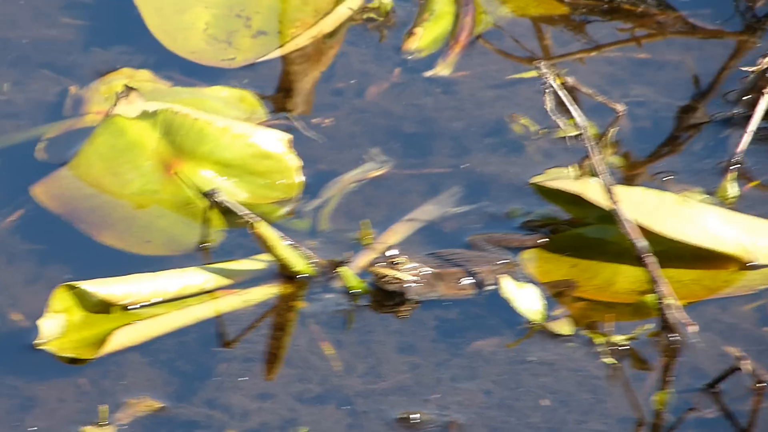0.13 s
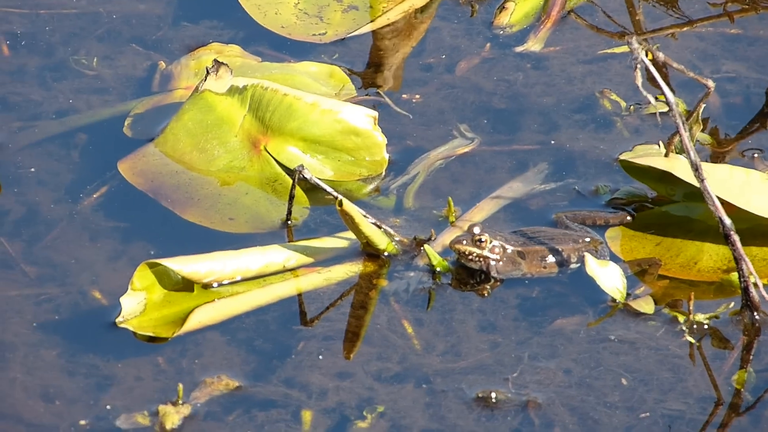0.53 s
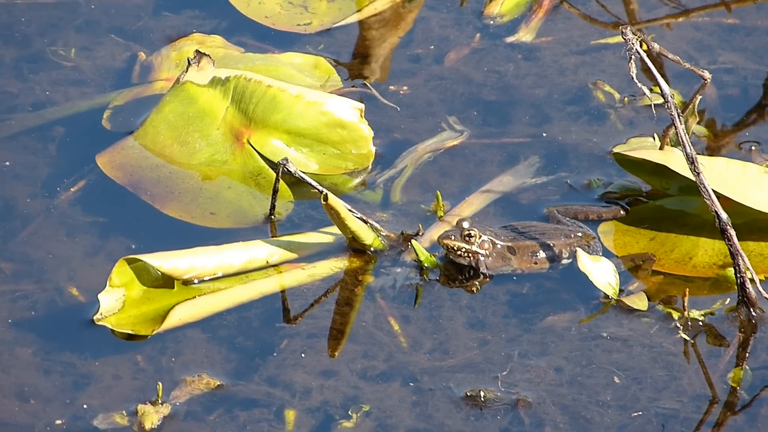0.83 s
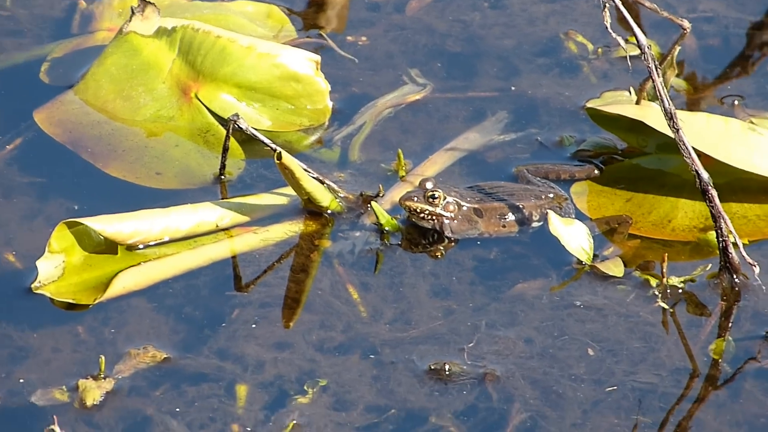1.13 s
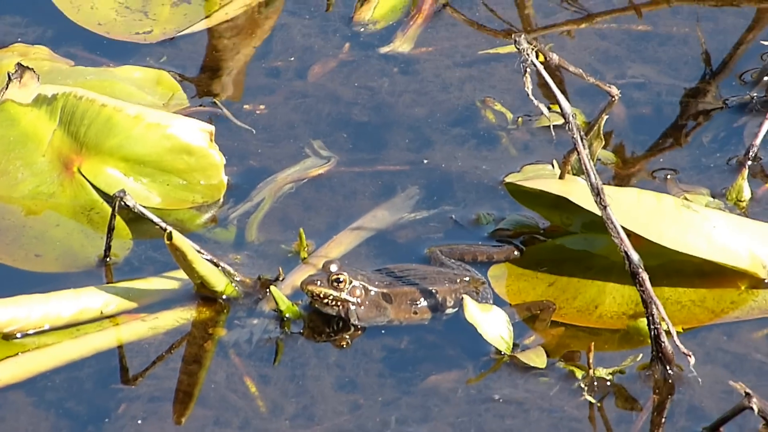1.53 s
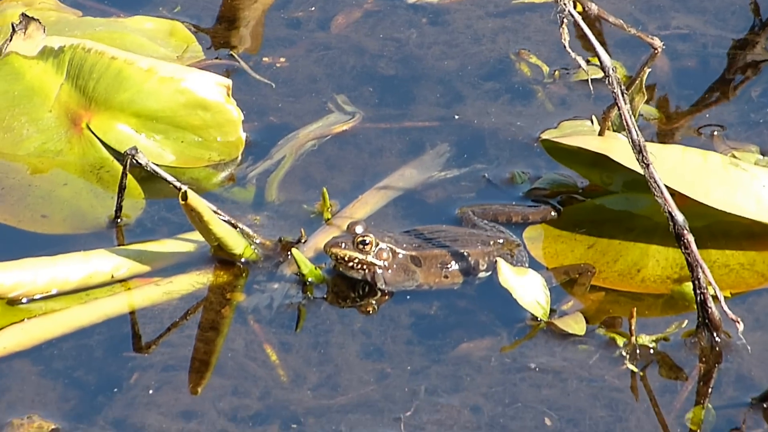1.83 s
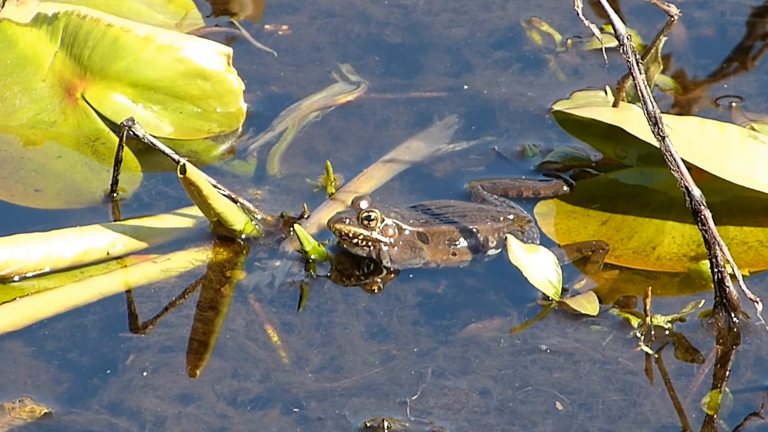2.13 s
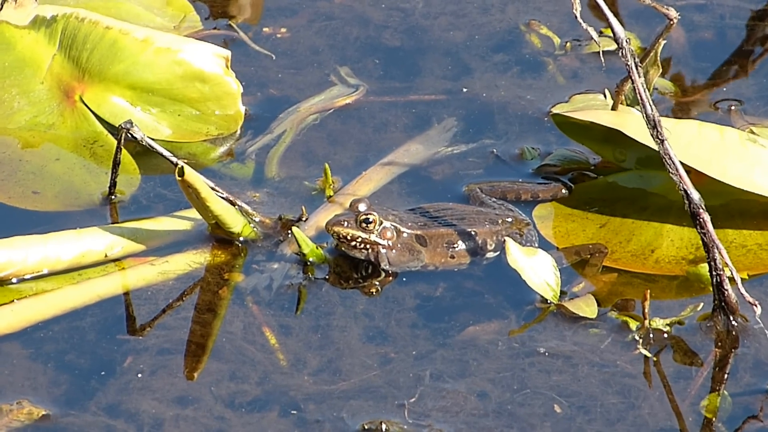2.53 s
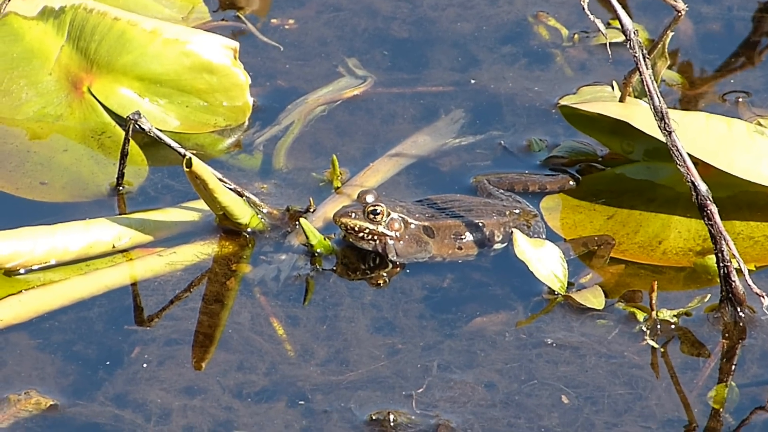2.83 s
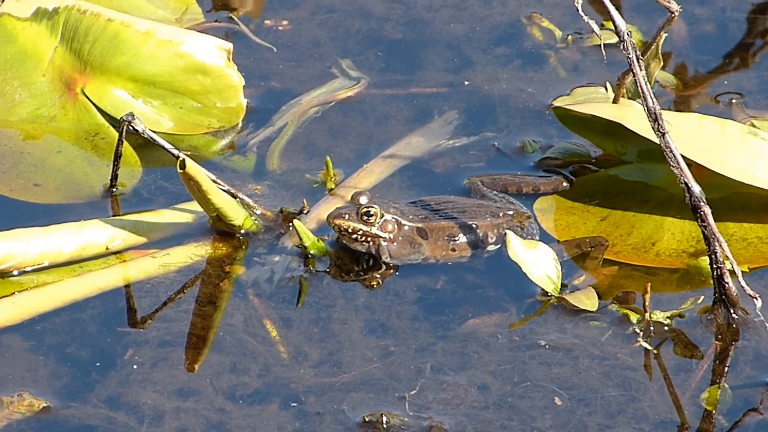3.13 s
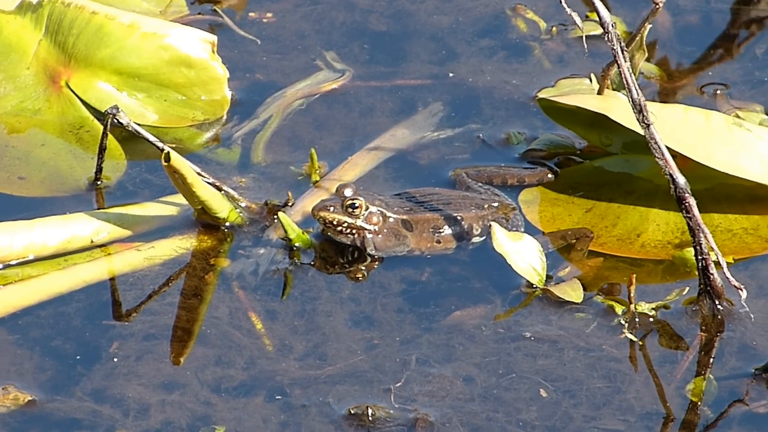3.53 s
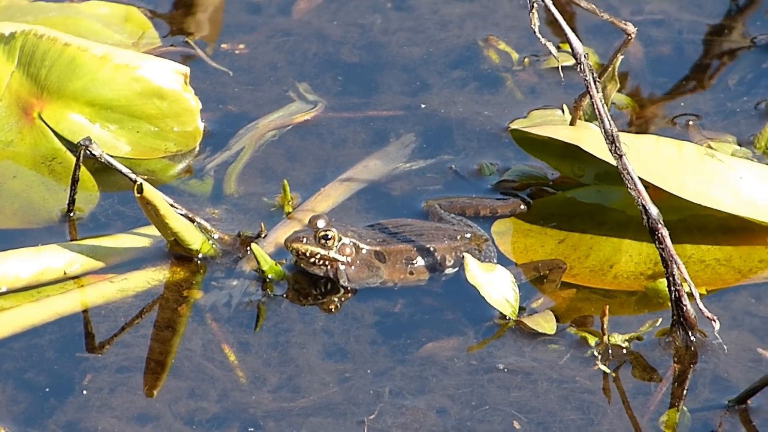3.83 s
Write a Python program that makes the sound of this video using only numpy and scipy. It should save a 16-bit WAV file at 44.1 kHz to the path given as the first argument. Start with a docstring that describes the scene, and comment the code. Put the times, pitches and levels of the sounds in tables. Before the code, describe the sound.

Frogs croaking rapidly in a swamp, overlapping short raspy croaks, with a distant chorus murmuring behind.

```python
"""A swamp, with frogs croaking near the microphone: each croak is a swelling train of clicks that rings the
vocal sac and stops short. Behind them a far chorus of the same voices murmurs, a distant engine drones,
slows and picks up a little at the end, small birds whistle, insects tick, reeds rustle and noise-made air
breathes. The microphone's two ports hear most of it louder on the right; sound comes on after a short silence."""
import sys
import numpy as np
from scipy import signal
from scipy.fft import rfft, irfft
from scipy.io import wavfile
from scipy.ndimage import uniform_filter1d

SR = 44100
rng = np.random.default_rng(int(sys.argv[2]) if len(sys.argv) > 2 else 0)


def makeup_ratio(level_db):
    """Linear amplitude ratio for a level in decibels (20 dB per factor of ten)."""
    decades = np.asarray(level_db, float) / 20
    return 10 ** decades


def to_wav(s):
    """Save 16-bit WAV."""
    ch = np.atleast_2d(s).T  # columns
    pcm = np.round(np.clip(ch, -1, 1) * 32767)  # PCM
    wavfile.write(sys.argv[1], SR, pcm.astype(np.int16))


N = 176400
T = np.arange(N) / SR


def level(x, db):
    """Scales a sound to an rms level in dB."""
    return x * makeup_ratio(db) / np.sqrt(np.mean(x ** 2))


def ring(x, hz, width_hz, times=1):
    """Resonance with gain 1 at its centre, passed one or more times."""
    b, a = signal.iirpeak(hz, hz / width_hz, fs=SR)
    for _ in range(times):
        x = signal.lfilter(b, a, x)
    return x


def walk(rate):
    """Random levels held 1 / rate s and smoothed twice over that time."""
    hold = int(SR / rate)
    steps = np.repeat(rng.standard_normal(N // hold + 1), hold)
    return 1.23 * uniform_filter1d(uniform_filter1d(steps, hold), hold)[:N]


def along(table, hz):
    """Reads a spectrum table on a log-frequency axis."""
    table = np.array(table, float)
    return np.interp(np.log(hz + 1), np.log(table[:, 0] + 1), table[:, 1])


def add(out, sound, s):
    """Mixes a sound into out from s seconds on, cut to fit."""
    i = int(s * SR)
    first, last = max(i, 0), min(i + len(sound), N)
    if last > first:
        out[first:last] += sound[first - i:last - i]


# Spectrum of breeze and hiss around the microphone.
# Each row: frequency in [Hz], relative density in [dB per Hz].
AIR_SPECTRUM = [(18, -50.5), (30, -24.5), (190, 5), (379, -8.5), (970, -1.5), (1440, 1.5), (2180, -11.5),
                (3490, -22.5), (4910, -20.5), (14000, -41), (15500, -66.5)]
AIR_DB = -47  # rms, before a slow waver


def air():
    """Breeze and hiss as shaped noise, partly different at the two ports, more so in the treble."""
    hz = np.fft.rfftfreq(N, 1 / SR)
    mid, side = (rfft(rng.standard_normal(N)) * makeup_ratio(along(AIR_SPECTRUM, hz)) for _ in range(2))
    side = side * np.clip(hz / 5000, .2, 1.2)
    ports = np.array([irfft(mid + side, N), irfft(mid - side, N)])
    return level(ports, AIR_DB) * makeup_ratio(walk(3))


# The distant engine over time.
# Each row: time in [s], firing rate in [Hz], level in [dB], brightness in [dB per order].
ENGINE_COURSE = [(.33,73.74,-39.5,-1),(0.598,74.92,-49,-5.5),(0.901,74.28,-41,-0.5),(1.311,73.8,-41,0),(1.501,72,-39,5.5),(1.75,66.6,-37.5,5.5),(1.948,62.44,-39.5,4),(2.381,58.4,-38,2.5),(2.478,56.76,-48.5,1.5),(2.701,56.16,-48.5,2.5),(3.121,52.26,-53,-1.5),(3.449,49.3,-67.5,-10),(3.681,50.88,-59,-7.5),(3.85,57.45,-47.5,-2.5),(4,58.6,-45.5,-2.5)]
# Colour given by exhaust and path. Each row: frequency in [Hz], gain in [dB].
EXHAUST_COLOUR = [(50,-41),(74,-14.5),(120,-5),(148,-1.5),(188,-5),(222,1.5),(250,2.5),(295,-9.5),(330,-27.5),(400,-58)]
HALF_ORDER_DB, WAVER_DB = -13, 2.5  # half orders are weaker; random waver of each order
ROAR_HZ, ROAR_WIDTH_HZ, ROAR_DB = 270, 81, -10  # gas roar in the pipe, before brightness and level


def engine():
    """Whole and half orders of the firing rate, each wavering on its way across the marsh, and gas roar."""
    s, hz, db, brightness = np.array(ENGINE_COURSE).T
    firing_hz, tilt = np.interp(T, s, hz), np.interp(T, s, brightness)
    phase = 2 * np.pi * np.cumsum(firing_hz * (1 + 0.0017 * walk(8.5))) / SR
    tone = np.zeros(N)
    for order in np.arange(2, 13) / 2:
        order_db = along(EXHAUST_COLOUR, order * firing_hz)
        order_db = order_db + 2 * HALF_ORDER_DB * (order % 1)  # order % 1 is 0 or 0.5
        order_db = order_db + tilt * (order - 3) + WAVER_DB * walk(15)
        tone += makeup_ratio(order_db) * np.sin(order * phase + 2 * np.pi * rng.random())
    roar = level(ring(rng.standard_normal(N), ROAR_HZ, ROAR_WIDTH_HZ, times=2), 0)
    return (tone + makeup_ratio(ROAR_DB + tilt) * roar) * makeup_ratio(np.interp(T, s, db))


# Thin whistles of small birds.
# Each row: start in [s], length in [s], start pitch in [Hz], end pitch in [Hz], level in [dB].
BIRD_WHISTLES = [(2.22,.09,3150,3300,-60),(3.295,.14,3290,3250,-57),(3.78,.045,3900,3750,-55)]


def bird_whistles():
    """Gliding sines with a slight random flutter of pitch and level."""
    out = np.zeros(N)
    for s, length, start_hz, end_hz, db in BIRD_WHISTLES:
        u = np.clip((T - s) / length, 0, 1)
        hz = (start_hz + (end_hz - start_hz) * u) * (1 + .006 * walk(150))
        envelope = makeup_ratio(db + 2.5 * walk(90)) * np.sin(np.pi * u) ** .5
        out += envelope * np.sin(2 * np.pi * np.cumsum(hz) / SR)
    return out


# Rustling reeds, and one slow, broad swell of airy hiss in the treble around 2 to 3 s. # Each row: time of the
# peak in [s], rise in [s], fall in [s], centre in [Hz], # width in [Hz], level of the noise in [dB].
RUSTLES_AND_HISS = [(.695,.03,.025,6000,6000,-56.5),(2.5,.6,.45,7000,4000,-71),(3.44,.035,.12,7600,1200,-65),(3.5,.07,.17,7000,4500,-61)]


def rustles_and_hiss():
    """Flickering bands of noise that swell and fade, partly different at the two ports."""
    out = np.zeros((2, N))
    for s, rise, fall, hz, width_hz, db in RUSTLES_AND_HISS:
        noise = rng.standard_normal(N) + .9 * rng.standard_normal((2, N))
        noise = noise * makeup_ratio(3 * walk(300))
        swell = np.exp(-((T - s) / np.where(T < s, rise, fall)) ** 2)
        out += level(ring(noise, hz, width_hz, times=2), db) * swell
    return out


SNAP_S, SNAP_LENGTH_S, SNAP_HZ, SNAP_DB = 2.608, .015, 4400, -41


def reed_snap():
    """A reed cracks: one short, abruptly gated burst of broad-band noise."""
    noise = ring(rng.standard_normal(N), SNAP_HZ, 7000, times=4)
    return level(noise, SNAP_DB) * (T > SNAP_S) * (T < SNAP_S + SNAP_LENGTH_S)


TICKS_S, TICK_GAP_S, TICK_HZ, TICK_DB = 3.72, .0188, 6800, -43


def insect_ticks():
    """Six evenly spaced specks of noise, each about 2 ms long, through a treble resonance."""
    ticks = np.zeros(N)
    for k in range(6):
        add(ticks, rng.standard_normal(90) * np.hanning(90), TICKS_S + k * TICK_GAP_S)
    return makeup_ratio(TICK_DB) * ring(ticks, TICK_HZ, 2500, times=2)


# Throat resonances beside the sac, before they vary from croak to croak.
# Each row: centre in [Hz], width in [Hz], gain in [dB].
THROAT_RESONANCES = [(531, 154, -16.5), (661, 347, -11.5), (862, 210, -18), (2022, 620, -27.5),
                     (2502, 390, -28.5), (3130, 1600, -31), (8500, 21000, -51.5)]
THROAT_SPREAD, THROAT_SPREAD_DB = .07, 1.5  # from croak to croak: share of the centre, dB
LATE_THROAT_S = .005  # lag of the resonances below the sac
SWELL_DB, STOP_S = 16, 0.0052  # rise over one swell, time constant of the fade after the end
CLICK_JITTER, CLICK_SPREAD_DB = .05, 2.5  # share of the gap between clicks, dB from click to click
CROAK_DB = -4  # added to every croak's level
# A voice lies between dull and bright by its treble in dB; each pair below is for dull, bright.
VOICE_TREBLE_DB, RASP_DB = [-30, -18], [-13, -16]
SAC_WIDTH_HZ, TREBLE_LEAD_S = [312, 440], [0.02, 0.014]  # the treble peaks before the end
TREBLE_WIDTH_HZ = [920, 410]  # for treble at 4.3 and at 5 kHz
TREBLE_SPAN = 0.82  # share of the swell


def croak(db, swell, clicks_hz, sac_hz, treble_db, treble_hz):
    """Uneven clicks and rasp ring sac, throat and treble; the sound starts .1 s before the croak's end."""
    t = np.arange(int(.14 * SR)) / SR - .1
    gap_chance, level_chance = rng.standard_normal((40, 2)).T
    gaps = (1 + CLICK_JITTER * gap_chance) / clicks_hz
    when = 2 * gaps[0] - np.cumsum(gaps)  # counted back from one gap after the end
    when = when[when > -.09]
    clicks = np.zeros(len(t))
    clicks[((when + .1) * SR).astype(int)] = makeup_ratio(CLICK_SPREAD_DB * level_chance[:len(when)])
    rasp = makeup_ratio(np.interp(treble_db, VOICE_TREBLE_DB, RASP_DB)) * rng.standard_normal(len(t))
    drive = level(clicks, 0) + rasp

    def stop(u):
        return np.exp(-np.maximum(u, 0) / STOP_S)

    def effort(u):
        return makeup_ratio(-SWELL_DB * (np.minimum(u, 0) / swell) ** 2) * stop(u)

    def voiced(shape, hz, width_hz, count=2):
        # the gain makes up for the noise power that a narrow band loses
        return ring(drive * shape, hz, width_hz, times=count) * np.sqrt(SR / width_hz / 2)

    sac_width_hz = np.interp(treble_db, VOICE_TREBLE_DB, SAC_WIDTH_HZ)
    sound = ring(voiced(effort(t), sac_hz, sac_width_hz), sac_hz, 900)
    chances = rng.standard_normal((len(THROAT_RESONANCES), 2))
    for (hz, width_hz, gain_db), (a, b) in zip(THROAT_RESONANCES, chances):
        shape = effort(t - LATE_THROAT_S * (hz < sac_hz))
        throat = voiced(shape, hz * (1 + THROAT_SPREAD * b), width_hz)
        sound -= makeup_ratio(gain_db + THROAT_SPREAD_DB * a) * throat
    lead = np.interp(treble_db, VOICE_TREBLE_DB, TREBLE_LEAD_S)
    early = np.exp(-((t + lead) / (TREBLE_SPAN * swell)) ** 2) * stop(t)
    treble_width_hz = np.interp(treble_hz, [4300, 5000], TREBLE_WIDTH_HZ)
    sound += makeup_ratio(treble_db) * voiced(early, treble_hz, treble_width_hz, count=3)
    return makeup_ratio(db + CROAK_DB) * sound


FAR_PER_S, FAR_DB, FAR_SPREAD_DB = 36, -42, -1  # levels before CROAK_DB; louder ones get a lower treble


def far_chorus():
    """Many faint croaks at random times merge into a murmur."""
    far = np.zeros(N)
    count = int(FAR_PER_S * 4)
    for u, a, b in zip(rng.random(count), *rng.standard_normal((2, count))):
        voice = croak(FAR_DB + FAR_SPREAD_DB * a, 0.052, 280, 1400 + 60 * b, -32.0, 4750 + 200 * a)
        add(far, voice, N / SR * u - .1)
    return far


# Croaks close to the microphone. Each row: end in [s], level in [dB] before CROAK_DB, swell in [s],
# click rate in [Hz], sac resonance in [Hz], treble gain in [dB], treble resonance in [Hz].
NEAR_CROAKS = [(0.334,-22,0.21,266.4,1385,-40,4170),(0.379,-12.5,0.04,256.7,1344,-30.5,4700),(0.417,-28.5,0.049,266.5,1343,-32,4900),(0.648,-23.5,0.034,296,1407,-38,5070),(0.683,-18,0.04,266.7,1370,-34,4780),(0.71,-17,0.027,258.1,1425,-28.5,4800),
               (0.922,-17.5,0.027,298.2,1420,-25.5,4270),(.955,-13.5,0.028,256.5,1408,-29,4660),(0.972,-20.5,0.018,263.2,1383,-37,4360),(0.997,-23.5,0.019,267.8,1354,-43,4700),(1.182,-18.5,0.027,294.8,1386,-32,4930),(1.263,-20,0.024,321.4,1405,-34,4950),(1.297,-16,0.028,258.3,1417,-31,4690),
               (1.385,-24.5,0.039,245.2,1365,-32,4560),(1.542,-18,0.029,290.3,1403,-25,4140),(1.578,-16.5,0.047,255.4,1306,-27.5,4580),(1.61,-21.5,0.078,258.2,1490,-46.5,4600),(1.73,-29.5,0.023,259.5,1280,-33,4450),(1.843,-22,0.027,309.6,1410,-32,4980),(1.92,-15,0.029,273.2,1415,-32,4870),
               (1.932,-20,0.018,255.7,1410,-41,4750),(1.966,-31,0.02,272,1244,-40.5,4880),(2.027,-13.5,0.022,307,1425,-16.5,4180),(2.137,-19.5,0.026,259.6,1370,-23,4220),(2.163,-23.5,0.046,252.3,1362,-28.5,4290),(2.224,-21.5,0.032,325,1447,-47,4600),(2.265,-17,0.039,315.4,1380,-46,4680),
               (2.288,-26.5,0.046,271.4,1384,-29,4860),(2.356,-30,0.046,269.8,1350,-31,4800),(2.446,-14.5,0.025,317.8,1263,-15,4120),(2.498,-19.5,0.043,295.5,1394,-42,5100),(2.568,-21.5,0.017,270,1396,-28,4820),(2.592,-12.5,0.032,267,1396,-37,4860),
               (2.743,-15,0.026,277,1384,-28,4350),(2.883,-17,0.048,264.4,1457,-39.5,4470),(2.911,-14.5,0.022,319.3,1400,-17,4340),(3.004,-22,0.025,281.5,1370,-28.5,5070),(3.062,-24.5,0.031,257,1266,-56,4650),(3.121,-19,0.034,301.2,1410,-35,4920),(3.209,-19,0.022,286.5,1460,-29,4670),
               (3.226,-13.5,0.026,272.4,1416,-33,4850),(3.307,-16,0.022,277.7,1346,-32.5,4360),(3.46,-16.5,0.027,271,1400,-22,4160),(3.5,-16.5,0.031,327.3,1236,-20,4400),(3.539,-19,0.035,260,1400,-36,4840),(3.557,-22,0.024,279.6,1514,-43,4900),(3.58,-22,0.057,267,1417,-35,4900),(3.63,-25.5,0.038,291,1420,-32.5,4900),
               (3.665,-22.5,0.021,246.6,1360,-36,4300),(3.83,-19.5,0.022,288.7,1475,-23,4630),(3.857,-11,0.019,269.8,1440,-32,4820),(3.89,-19.5,0.076,247.3,1377,-33.5,4080),(3.981,-24,0.021,278.2,1360,-49,4720)]


def near_croaks():
    """Each near frog croaks at its time."""
    near = np.zeros(N)
    for end, *voice in NEAR_CROAKS:
        add(near, croak(*voice), end - .103)  # 3 ms early, as the sac rings on a little
    return near


VOICE_LOW_HZ, VOICE_TOP_HZ = 450, 13000
POND_T60_S, POND_DB = 0.31, -11.5


def frogs():
    """Near croaks and far chorus with the short echo of the banks, a different noise tail at each port."""
    band = signal.butter(4, [VOICE_LOW_HZ, VOICE_TOP_HZ], 'band', fs=SR, output='sos')
    direct = signal.sosfilt(band, near_croaks() + far_chorus())
    t = T[:int(.5 * SR)]
    echoes = []
    for _ in range(2):
        tail = rng.standard_normal(len(t)) * makeup_ratio(-60 * t / POND_T60_S) * (t > .006)
        echoes.append(signal.fftconvolve(direct, tail / np.sqrt(np.sum(tail ** 2)))[:N])
    return direct + makeup_ratio(POND_DB) * np.array(echoes)


def scene():
    """The swamp from its background to the near frogs."""
    return air() + engine() + bird_whistles() + rustles_and_hiss() + reed_snap() + insect_ticks() + frogs()


def low_pass(x):
    """Removes everything above the highest recorded frequency."""
    return signal.sosfilt(signal.butter(12, 15720, fs=SR, output="sos"), x)


# Left port of the microphone against the right. Each row: frequency in [Hz], level difference in [dB].
LEFT_OVER_RIGHT = [(60,5.5),(110,0),(200,-6.5),(380,-8.5),(1290,-6.5),(2380,-6),(4400,-0.5),(8120,-4),(15000,2.5)]
# Lead of the left port over the right. Each row: frequency in [Hz], phase in [radians].
LEFT_PHASE_LEAD = [(60,0.23),(260,-0.78),(520,0.89),(1550,0.61),(2410,1),(4050,0.28),(15000,1)]
START_S = .322


def record(dry):
    """The ports differ in level and phase by band; sound comes on within 3 ms after a silence."""
    hz = np.fft.rfftfreq(N, 1 / SR)
    # half of the difference goes to each port
    half = makeup_ratio(along(LEFT_OVER_RIGHT, hz) / 2) * np.exp(.5j * along(LEFT_PHASE_LEAD, hz))
    ports = np.array([half, 1 / half])
    ports = ports * 2 / np.abs(ports.sum(0))  # keeps the sum of both ports even over frequency
    heard = irfft(rfft(dry) * ports, N)
    mix = heard * np.clip((T - START_S) / .003, 0, 1)
    return low_pass(mix)


dry = scene()
out = record(dry)
to_wav(out)
```